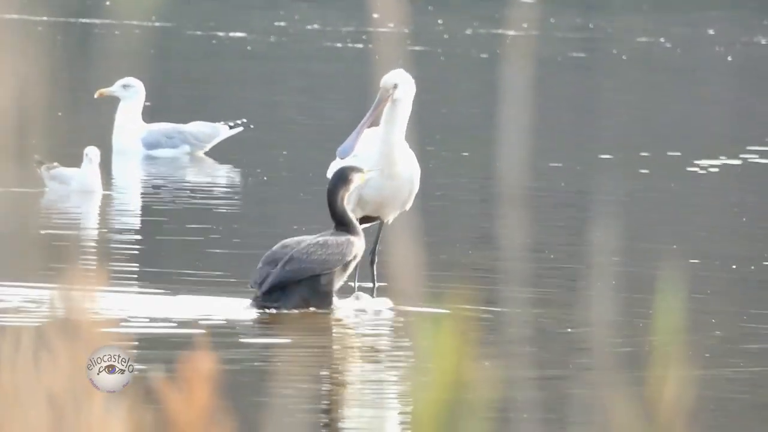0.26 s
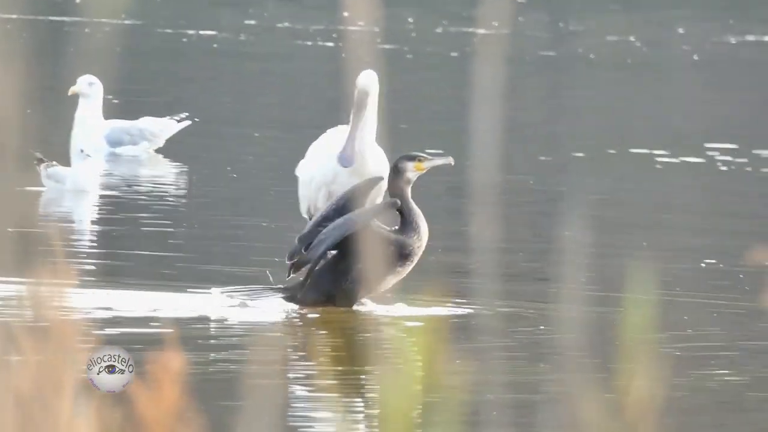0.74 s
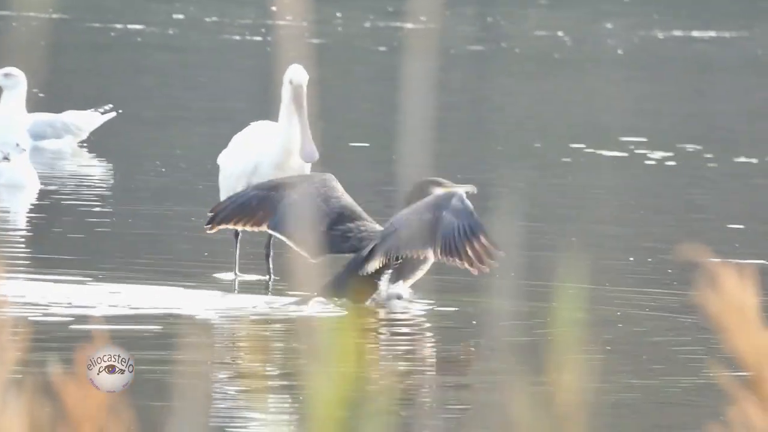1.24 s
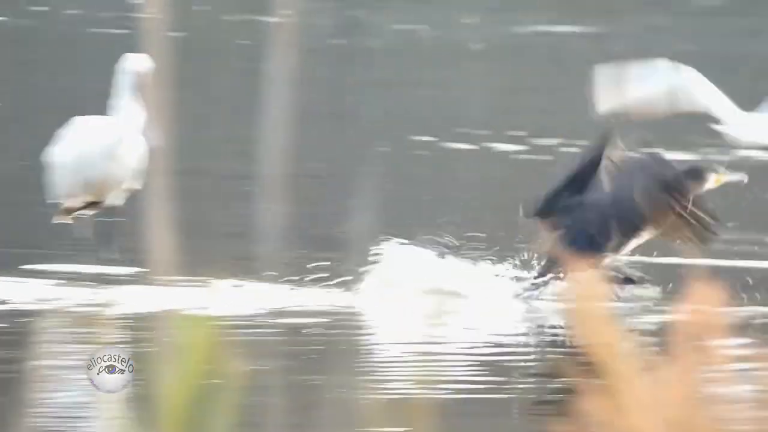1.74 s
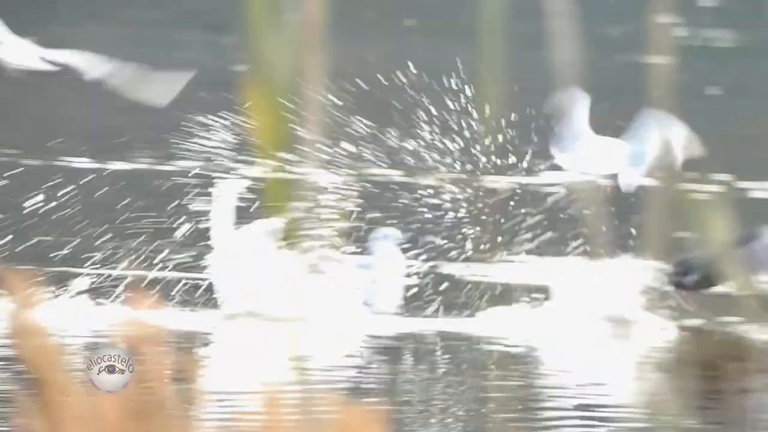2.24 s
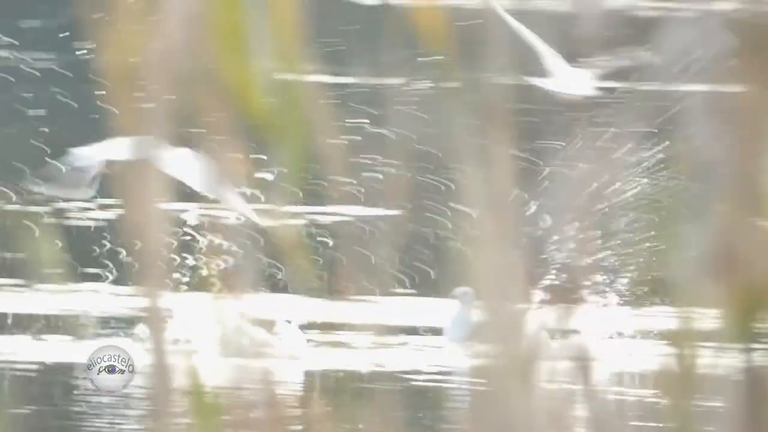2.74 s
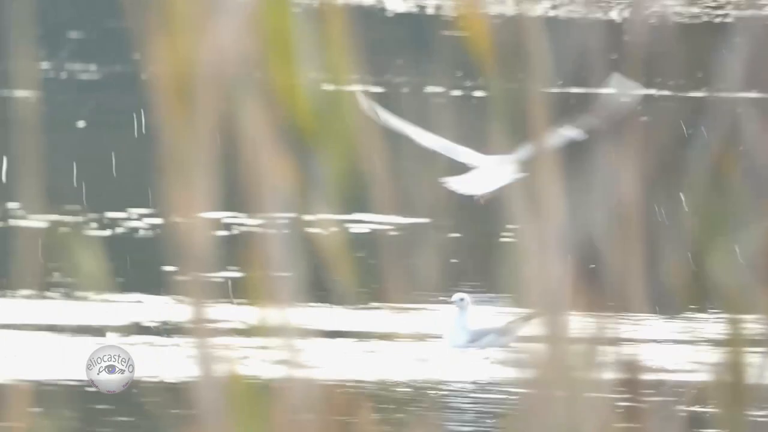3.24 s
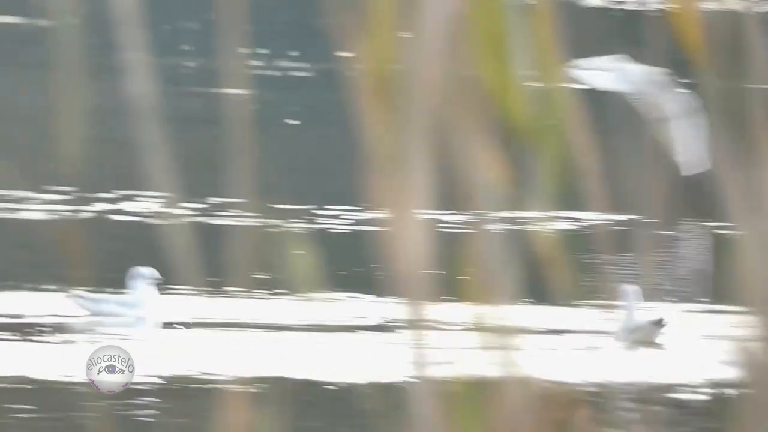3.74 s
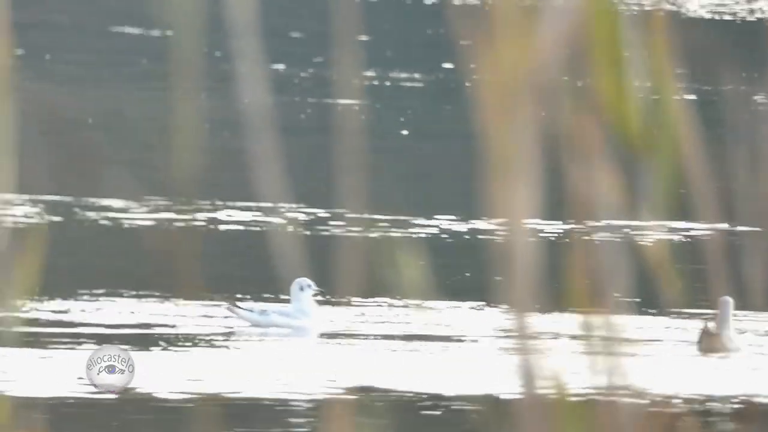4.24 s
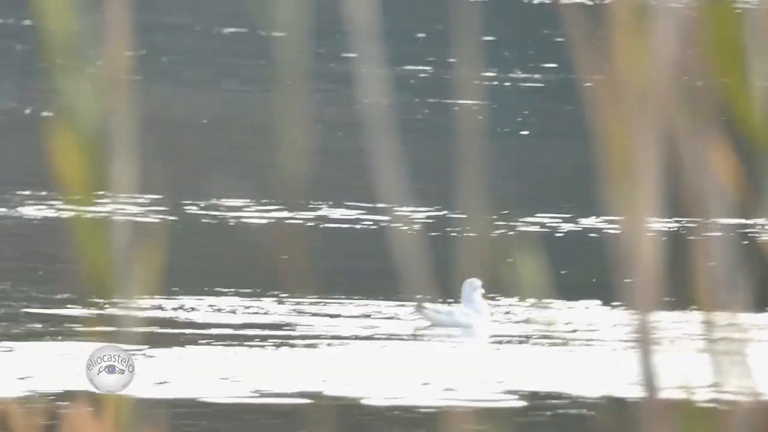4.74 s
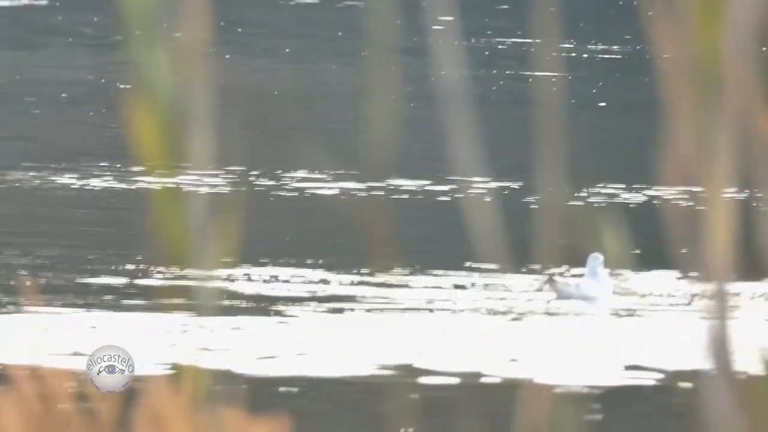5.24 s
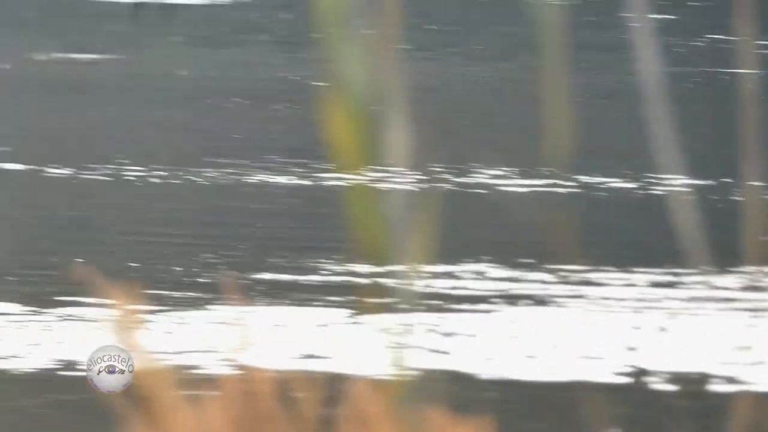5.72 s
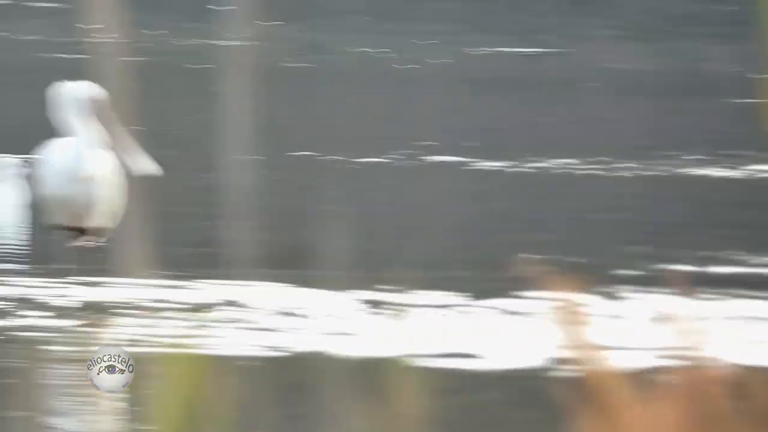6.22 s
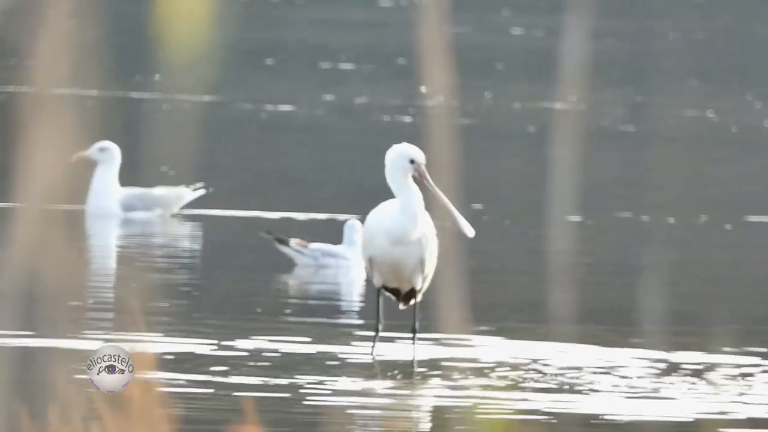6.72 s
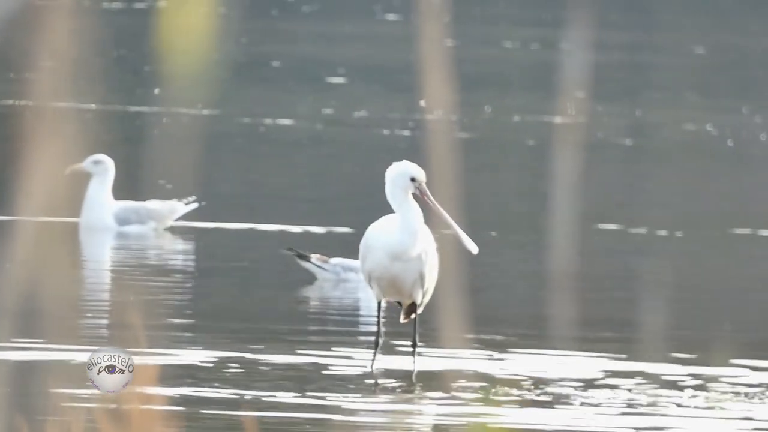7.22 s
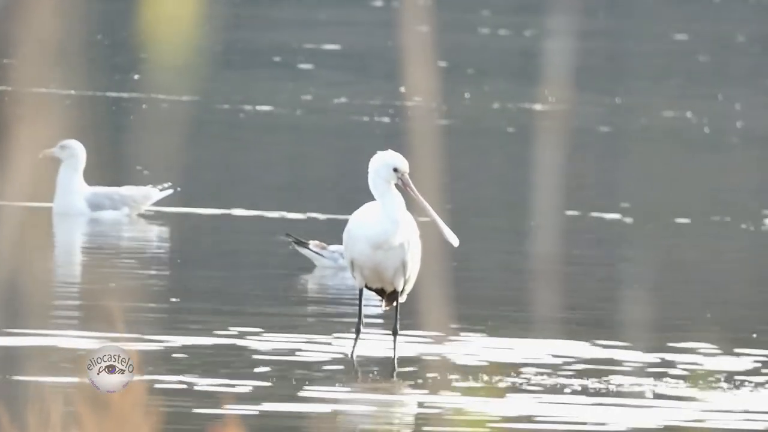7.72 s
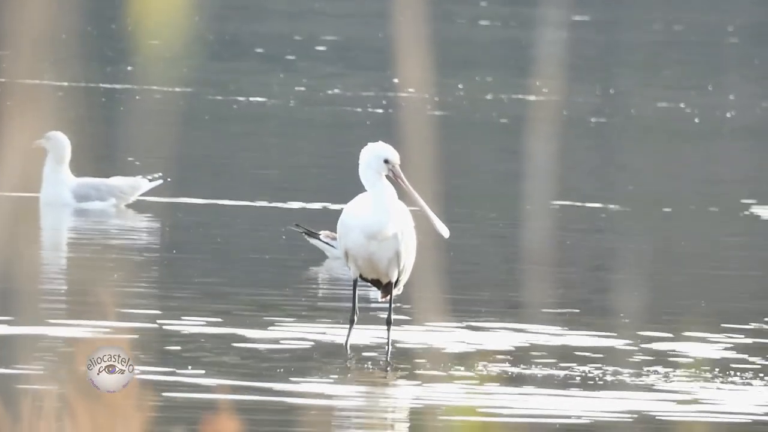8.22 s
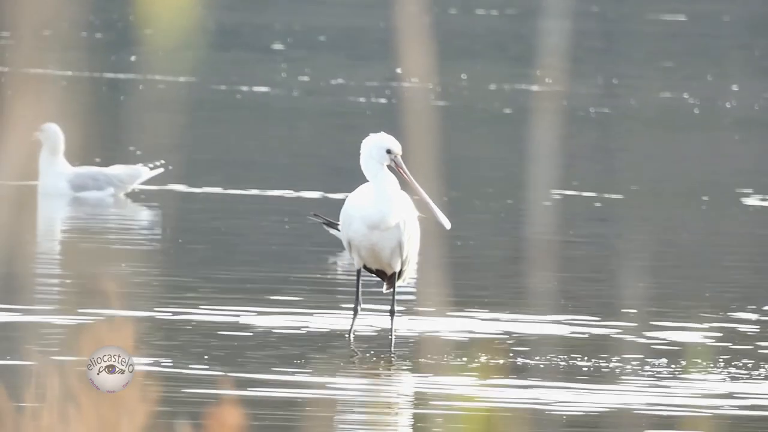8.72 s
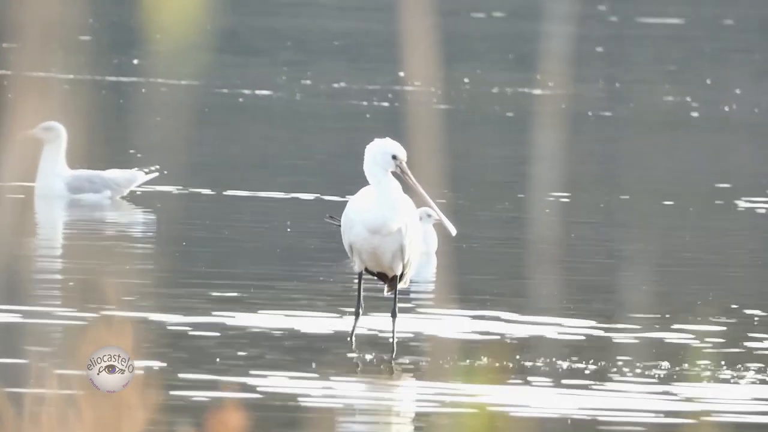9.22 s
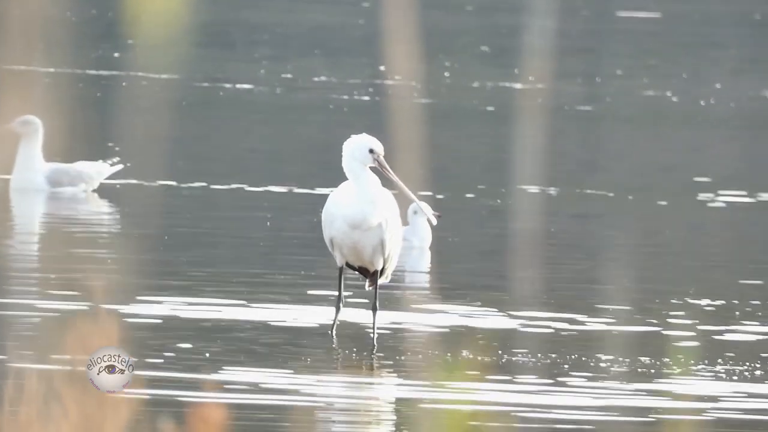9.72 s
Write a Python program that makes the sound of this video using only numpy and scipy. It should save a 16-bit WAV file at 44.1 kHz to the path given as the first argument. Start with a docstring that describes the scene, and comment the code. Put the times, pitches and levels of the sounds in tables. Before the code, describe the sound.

In an open wetland, through a small camera, a hollow low-mid hum and thin hiss run throughout. A large water bird takes off with about five or six sharp wet slaps per second, throwing fine spray that patters down and fades. Dull close ticks and soft bumps intrude. A small far bird gives occasional short rising whistles, others chip faintly, and later a distant engine drones low and goes away.

```python
"""A wetland, heard through a small camera: far wind and traffic hum in the hollows of its housing, over steady
hiss. A water bird takes off with regular slaps (cracks, short rings, splutter) and spray (coloured noise and
ringing drops); its first light strokes, heard as dull ticks, already keep the beat of the slaps. Other dull
ticks and low thumps fall close by. A small far bird whistles rising sine notes, the first already ending as the
scene opens in a fluttering rising glide; others answer with faint chips, most of them falling, and a fluttering
falling glide, smeared by echoes. A distant engine, one wavering sine, comes and goes."""
import sys
import numpy as np
from scipy import signal
from scipy.fft import rfft, irfft, next_fast_len
from scipy.io import wavfile
from scipy.ndimage import uniform_filter1d, map_coordinates

SR = 44100
rng = np.random.default_rng(int(sys.argv[2]) if len(sys.argv) > 2 else 0)


def dump(signal):
    """Clip the signal to [-1, 1] and save it as 16-bit WAV at the path in sys.argv[1]."""
    limited = np.clip(np.atleast_2d(signal).T, -1, 1)
    pcm = np.round(limited * 32767).astype(np.int16)
    wavfile.write(sys.argv[1], SR, pcm)


N = 439236

# Deep hollows of the housing, alike at both ports: centre_hz, width_hz, relative level_db
DEEP_HOLLOWS = [(384, 34, -5), (424, 32, 1), (452, 40, -5), (479, 34, -7), (525, 70, -19)]
# Smaller hollows: centre_hz, width_hz, relative level_db, left_minus_right_db
SMALL_HOLLOWS = [(631, 24, -4, -8), (658.7, 22.6, -2, 11.5), (766, 98, 1.5, -5), (856, 62, 0, -0.5),
                 (922, 210, -10, -12.5), (1164, 104, -8.5, 7), (1319, 110, -2, -3), (1555, 130, -7, 0),
                 (1674, 175, -12.5, -5.5), (1945, 340, -16.5, -1.5), (2318, 260, -18, 4.5),
                 (2690, 360, -20, -1.5), (3050, 180, -24, 4)]
# Hum of the deep hollows, before gusts: time_s, level_db
HUM_LEVEL = [(0, -49.5), (.9, -46), (1.9, -48.5), (2.2, -45.5), (3.1, -45.5), (3.7, -47.5), (4.5, -47.5),
             (6.5, -46.5), (8.1, -48), (9.2, -46.5), (9.96, -47)]
# Traffic rumble, before its wobble: time_s, level_db
TRAFFIC_LEVEL = [(0, -60), (.14, -58.5), (.7, -64), (1.9, -63), (2.2, -58), (3.2, -62), (4.2, -65),
                 (5.4, -61.5), (6.35, -49.5), (7, -54.5), (7.55, -56), (8.2, -56), (9.2, -62.5),
                 (9.96, -59.5)]
# Deepest rumble, before its wobble: time_s, level_db
DEPTH_LEVEL_POINTS = [(0, -72), (.6, -74), (2.2, -79), (3.6, -70.5), (5.1, -66.5), (6.4, -62.5), (8.3, -73),
                      (8.8, -63.5), (9.96, -73)]
# Colours of the rumble and of its deepest part: pitch_hz, relative density_db_per_hz
RUMBLE_COLOUR = [(65, -37), (110, -8), (156, -2), (199, -3), (227, -3.5), (339, -3), (360, -20.5),
                 (470, -8.5), (790, -120)]
DEPTH_COLOUR = [(15, -60), (25, -48), (43, -26.5), (87, -3.5), (110, 0), (140, -20), (240, -120)]
# Hiss shared by left and right: pitch_hz, relative density_db_per_hz
SHARED_HISS_COLOUR = [(1650, -25), (2800, -3.5), (3670, -1), (4120, -3.5), (5480, -3), (5850, -5.5),
                      (6370, -1.5), (7730, -6.5), (9850, 1), (14400, -8.5), (15500, -11)]
# Hiss of opposite sign left and right: pitch_hz, relative density_db_per_hz
OPPOSITE_HISS_COLOUR = [(18, -55), (30, -28), (117, -10), (369, -13), (440, -20), (545, -25), (590, -16),
                        (638, -0.5), (727, 0), (1100, -17), (1330, -8), (2600, -22.5), (5440, -40),
                        (7800, -36), (8500, -25.5), (9660, -19), (14800, -26), (15500, -37)]
# Falling water: pitch_hz, relative density_db_per_hz
WATER_COLOUR = [(880, -51), (1500, -28), (1570, 3.5), (2110, -13), (2310, 0), (2510, -10), (2680, -2.5),
                (3340, -12.5), (3870, -5.5), (4690, -8), (5140, -3), (6960, -5.5), (7850, -13),
                (10100, -6.5), (13500, -31)]
# Rising whistles: start_s, length_s, pitch_a_third_in_hz, knee (share of length), knee_hz,
# leap (share of the time after the knee), base level_db
WHISTLES_HEARD = [(2.398, .12, 3950, .58, 4050, .55, -62.5), (4.86, .116, 3770, .65, 4280, .55, -65.5),
                  (6.19, .13, 3720, .7, 4350, .55, -67.5), (8.1, .128, 3580, .66, 4320, .47, -66.5),
                  (9.852, .125, 3580, .46, 3780, .42, -63.5)]
# Whistle level at start, third, knee, mid-leap, near the top, end: offset_db
WHISTLE_CONTOUR = [-11, -1.5, 1, -3.5, .5, -6]
# Fluttering pitch glides, one rising and one falling:
# start_s, length_s, start_hz, end_hz, slowing (exponent), base level_db
GLIDES_HEARD = [(.015, .06, 3850, 5350, 1.3, -76), (3.752, .165, 5620, 3620, 2.3, -74)]
# Glide level along its length: offset_db
GLIDE_CONTOUR = [-5, 1.5, -3, -6, -8]
# Short notes of other birds, and one low blip: start_s, length_s, start_hz, end_hz, base level_db
CHIPS_HEARD = [(.012, 0.022, 2800, 3000, -79), (.26, 0.033, 3100, 2590, -76), (.27, .035, 4150, 3800, -75),
               (.47, .04, 4600, 4500, -82), (1.915, 0.013, 1700, 1580, -52),
               (1.978, 0.015, 5110, 4970, -61), (2.17, .015, 4320, 4220, -63),
               (2.648, .025, 6330, 6300, -64.5), (2.81, .02, 5700, 5500, -71),
               (2.882, 0.035, 5460, 5750, -68), (3.22, 0.033, 7050, 6880, -70),
               (3.85, .015, 6600, 6500, -78), (4.01, .02, 6230, 6300, -72), (4.085, 0.044, 6700, 6350, -73),
               (4.2, .035, 5700, 5480, -75), (2.277, .016, 3730, 4250, -68), (2.712, .01, 6900, 6800, -65),
               (7.21, 0.06, 6250, 6100, -82), (8.032, .03, 4000, 3500, -75), (8.207, .018, 4250, 3850, -72),
               (8.238, .03, 5000, 3600, -80), (8.518, .035, 5000, 3600, -77.5),
               (8.605, .03, 5150, 5350, -78), (8.785, .022, 4300, 3700, -76),
               (8.81, .035, 4700, 3570, -75.5), (8.972, .048, 4150, 3680, -78),
               (9.07, .04, 4800, 4300, -82), (9.17, .06, 4400, 4000, -80), (9.025, .015, 4300, 3700, -74),
               (9.045, .05, 4800, 3400, -75.5), (9.165, .03, 4100, 3400, -80),
               (9.432, .02, 6200, 4800, -86), (9.44, 0.038, 3900, 4180, -81), (9.47, .02, 4500, 3800, -77),
               (9.485, .03, 4600, 3800, -79), (9.538, .02, 4600, 4100, -81), (9.508, .025, 4040, 3700, -80),
               (9.89, 0.036, 4500, 4200, -72)]
# Chip level, quick start, even body, fade: offset_db
CHIP_CONTOUR = [-8, -3, -2, -3, -9]
# Clearest dull ticks, levels before trims; the first three are the bird's first light strokes, in step with the
# # slaps that follow: start_s, pat_db, pitch_hz, knock_db, bright_edge_db
CLEAREST_TICKS = [(0.1455, -47.5, 3080, -63, -54), (0.3375, -56, 2710, -58, -53),
                  (0.521, -52, 2010, -69, -55), (0.7994, -63, 2620, -57, -75), (0.825, -52, 2900, -70, -73),
                  (1.152, -50, 2330, -67, -54), (.408, -57, 3400, -73, -62), (1.209, -51, 4300, -68, -72),
                  (2.008, -57, 3600, -58, -62), (2.176, -52, 3600, -62, -56), (2.488, -49, 2480, -64, -72),
                  (1.5494, -49, 2280, -62, -67), (2.0462, -56, 2300, -55, -69),
                  (2.414, -48, 2600, -50.5, -68), (2.59, -57, 2140, -59, -68),
                  (4.3161, -53, 2080, -53.5, -75), (4.8458, -50, 2100, -51, -68),
                  (5.048, -48, 2090, -56, -68), (5.1816, -51, 2100, -52.5, -66),
                  (5.233, -58, 2300, -59, -67), (5.349, -50, 2680, -55, -61), (5.4194, -59, 2550, -53, -76),
                  (5.4819, -53, 3320, -50.5, -70), (5.5823, -54, 2010, -51, -67),
                  (5.7467, -50, 2020, -57, -64), (5.9145, -49, 2100, -48, -64),
                  (6.015, -54, 2600, -53, -71), (6.1594, -50, 2180, -50, -49.5),
                  (6.1823, -45, 2700, -56, -52), (7.5214, -50, 3520, -71, -57),
                  (7.5328, -47, 3080, -68, -68), (7.829, -45, 2670, -56, -83)]
# Knock under a tick: pitch_hz, relative level_db, t60_s
KNOCK_MODES = [(737, -2.5, 0.031), (1292, -3.5, 0.038), (1570, -5.5, 0.037)]
# Colour of a soft pat: pitch_hz, gain_db
PAT_COLOUR = [(500, -36), (1000, -39), (2600, -2.5), (4000, -6.5), (5000, -47), (7000, -60)]
# Low bumps: start_s, drive_db (before trim and onset), pitch_hz
BUMPS = [(0.119, -60, 154), (1.63, -65, 108), (2.958, -57, 100), (3.82, -60, 110), (3.978, -62, 123)]
# Wings and feet striking the water, drives before shaping:
# start_s, ring_db, pitch_hz, upper_ring_db, splash_db, crack_db
WATER_SLAPS = [(0.706, -52, 1990, -71, -51, -40), (0.7155, -57, 2900, -67, -59, -46),
               (0.892, -49, 2170, -64, -51, -34), (1.0752, -48, 2660, -56, -54, -36),
               (1.26, -48.5, 2110, -65, -53, -31), (1.4392, -48, 2150, -53, -53, -35),
               (1.6182, -41.5, 2210, -60, -47, -24), (1.795, -42.5, 2400, -56, -47, -31),
               (1.972, -48, 2330, -53, -45.5, -38), (2.146, -49, 2780, -76, -51, -30),
               (2.3603, -69, 2700, -72, -50, -40), (2.5372, -49, 1960, -55, -52, -38),
               (2.7258, -47.5, 2000, -51, -53, -39), (2.916, -41.5, 2280, -52, -51, -35),
               (3.097, -44, 1580, -51, -54, -40), (3.109, -54, 2830, -48, -60, -42),
               (3.2837, -39.5, 2210, -50, -46, -26), (3.466, -52, 2400, -58, -59, -40),
               (3.469, -47, 2090, -47, -52, -32), (3.653, -46, 2400, -49, -59, -40),
               (3.8396, -44.5, 2240, -68, -52, -36), (4.0222, -55, 1900, -56, -57, -38)]
# Ring of a slap: multiple of its pitch (ratio), relative level_db, t60_s
SLAP_MODES = [(.72, -10, 0.015), (1, 2.5, 0.012)]
# Upper ring of a slap: pitch_hz, relative level_db, t60_s
UPPER_SLAP_MODES = [(3770, -2.5, 0.019), (4220, 0, 0.012), (5020, -5, 0.021)]
# Colour of the crack in a slap: pitch_hz, gain_db
CRACK_COLOUR = [(600, -30), (1600, -13), (5000, -3.5), (10500, -11), (13000, -20), (16000, -50)]
# Engine note, before its wavering: time_s, pitch_hz, level_db
ENGINE_NOTE = [(4.25, 231, -82), (4.45, 231, -68), (4.95, 231.5, -65.5), (5.07, 231, -82), (5.35, 230, -82),
               (5.55, 229.6, -61), (5.9, 229.6, -59.5), (6.12, 229.6, -55.5), (6.6, 229.6, -58),
               (7.12, 229.4, -59), (7.27, 229, -74), (7.75, 228.5, -69), (7.9, 228.5, -61.5),
               (8.35, 227.5, -66), (8.6, 227, -80), (8.7, 227, -100)]
# Band that carries across the water: pitch_hz, gain_db
TREBLE_BAND = [(1100, -24), (2200, -5), (3500, -7), (10500, -7.5), (13000, -20), (16000, -50)]

TOP_HZ = 15670
HISS_PAN_DB, FAR_PAN_DB = -0.2, 0.8  # left minus right; far means slaps and birds
# Small hollows: base level, then exponents on the hum and traffic levels, and share of the gusts
SMALL_DB, SMALL_FOLLOWS_HUM, SMALL_FOLLOWS_TRAFFIC, SMALL_GUSTS = -60, 0.82, 0.17, .55
# Spray is fullest from the peak time for the hold time
SPRAY_PEAK_S, SPRAY_HOLD_S, SPRAY_BASE_DB = 2.21, 0.33, -62.5
SPRAY_RISE_DB_PER_S, SPRAY_FALL_DB_PER_S = 8, 5.5
LOOSE_DROPS_END_S = 4.9  # drops not thrown by slaps fall evenly until then
DROP_DELAY_S, THROWN_SHARE = .08, 0.35  # mean delay after a slap; share of drops thrown by slaps
SURGE_DB, SURGE_S = 1.6, .06  # swell of the spray at a slap; time constant of its sinking
WHISTLE_LOW_HZ, WHISTLE_TOP_HZ = 3400, 5400
LEAP_DONE = .72  # share of the climb from knee to top made in the steep leap
CHIP_FLUTTER_DB = 3.1
TWITTER_FROM_S, TWITTER_S, TWITTER_BASE_DB = 7.9, 2, -86
FAINT_TICK_BASE_DB, FAINT_TICK_SPAN_S, FAINT_TICK_BRIGHT_DB = -59.5, 4.8, -72


def amp(db):
    """Gain of a level in dB."""
    return 10 ** (np.asarray(db) / 20)


def unit(x):
    """x at rms 1."""
    return x / np.sqrt(np.mean(x ** 2) + 1e-20)


def along(points, hz):
    """Reads (Hz, value) points on a log pitch axis."""
    f, v = np.transpose(points)
    return np.interp(np.log(hz + 1), np.log(f + 1), v)


def level(rows):
    """Gain for each sample from (s, dB) rows."""
    s, db = np.transpose(rows)
    return amp(np.interp(np.arange(N) / SR, s, db))


def wobble(rate):
    """A smooth random curve, rate knots a second."""
    knots = rng.standard_normal(int(N * rate / SR) + 4)
    return map_coordinates(knots, [np.arange(N) * rate / SR])


def filtered(x, response):
    """x shaped by a gain that depends on frequency."""
    m = next_fast_len(N + SR // 2)
    return irfft(rfft(x, m) * response(np.fft.rfftfreq(m, 1 / SR)), m)[..., :N]


def coloured(x, colour):
    """x through a table of (Hz, dB) gains."""
    return filtered(x, lambda hz: amp(along(colour, hz)))


def rush(colour, patchy_db):
    """Coloured noise of rms 1 whose gain varies in random patches of time and pitch."""
    z = signal.stft(rng.standard_normal(N + 512), nperseg=512)[2]
    across_pitch = uniform_filter1d(rng.standard_normal(z.shape), 5, 0)
    patches = unit(uniform_filter1d(across_pitch, 8, 1))
    noise = signal.istft(z * amp(patchy_db * patches), nperseg=512)[1][:N]
    return unit(coloured(noise, colour))


def add(track, s, sound):
    """Mixes a short sound into the track at time s."""
    part = track[round(s * SR):][:len(sound)]
    part += sound[:len(part)]


def echo(x, t60):
    """The scattered answer of reeds and banks: a decaying noise tail."""
    t = np.arange(SR // 4) / SR
    tail = rng.standard_normal(len(t)) * amp(-60 * t / t60)
    return signal.fftconvolve(x, tail / np.linalg.norm(tail))[:N]


def ring(modes, t, rise_s):
    """Decaying modes struck at slightly new strengths and pitches."""
    chance = rng.normal([0, 1], [1.8, .03], size=(len(modes), 2))  # dB, pitch ratio
    sound = 0
    for (hz, db, t60), (more_db, bend) in zip(modes, chance):
        decay = amp(db + more_db - 60 * t / t60)
        sound = sound + decay * np.sin(2 * np.pi * hz * bend * t)
    return sound * (1 - np.exp(-t / rise_s))


def treble(x):
    """Only the upper band of a noise burst carries across the water."""
    return coloured(x, TREBLE_BAND)


def hollow(hz, centre, width, db):
    """Power passed by a steep-sided resonance."""
    return amp(db) ** 2 / (1 + (2 * (hz - centre) / width) ** 2) ** 2


def deep_response(hz):
    """Gain of the deep hollows, their powers summed."""
    return np.sqrt(sum(hollow(hz, *row) for row in DEEP_HOLLOWS))


def small_response(hz):
    """Gain of the small hollows at the left and right ports, their powers summed."""
    power = 0
    for centre, width, db, pan in SMALL_HOLLOWS:
        power = power + hollow(hz, centre, width, [[db + pan / 2], [db - pan / 2]])
    return np.sqrt(power)


def hum():
    """Outdoor noise sets the hollows ringing; each small one reaches the two ports at its own strength."""
    white = [(100, 0), (1000, 0)]
    deep = unit(filtered(rush(white, patchy_db=2.5), deep_response))
    small = unit(filtered(rush(white, patchy_db=2.0), small_response))
    gust = .4 * wobble(9) + 1.1 * wobble(22)
    deep_gain = level(HUM_LEVEL) * amp(1.23 * gust)
    follow = level(HUM_LEVEL) ** SMALL_FOLLOWS_HUM * level(TRAFFIC_LEVEL) ** SMALL_FOLLOWS_TRAFFIC
    small_gain = amp(SMALL_DB) * unit(follow) * amp(SMALL_GUSTS * gust)
    return deep_gain * deep + small_gain * small


def traffic():
    """Far rumble of low noise, with a deeper part that swells on its own."""
    rumble = level(TRAFFIC_LEVEL) * amp(0.13 * wobble(11.0)) * rush(RUMBLE_COLOUR, patchy_db=1.4)
    depth = level(DEPTH_LEVEL_POINTS) * amp(2.2 * wobble(3.3)) * rush(DEPTH_COLOUR, patchy_db=1)
    return rumble + depth


def hiss():
    """Steady hiss: a shared noise plus a noise of opposite sign left and right."""
    shared = amp(-72) * rush(SHARED_HISS_COLOUR, patchy_db=1.2)
    opposite = amp(-72) * rush(OPPOSITE_HISS_COLOUR, patchy_db=0.9)
    return np.array([shared + opposite, shared - opposite]) * amp([[HISS_PAN_DB / 2], [-HISS_PAN_DB / 2]])


def spell(start, length, db, rise_db_per_s, fall_db_per_s):
    """A level in dB that climbs to db, holds for the length and sinks again."""
    t = np.arange(N) / SR
    climb = rise_db_per_s * np.maximum(start - t, 0)
    fall = fall_db_per_s * np.maximum(t - start - length, 0)
    return db - climb - fall


def surges():
    """Between 0 and 1: rises quickly into each slap and sinks back after it."""
    since = np.arange(N) / SR - np.array(WATER_SLAPS)[:, :1]
    rise, fall = np.exp(-np.abs(since) / .03), np.exp(-np.abs(since) / SURGE_S)
    return np.where(since > 0, fall, rise).max(axis=0)


def water_drops(count=3500):
    """Single drops, each ringing for a few cycles; some cluster after the slaps."""
    when, pitch, size, thrown, late = rng.random((count, 5)).T
    slap_s = np.array(WATER_SLAPS)[(when * len(WATER_SLAPS)).astype(int), 0]
    after_slap_s = slap_s - DROP_DELAY_S * np.log(late)
    s = np.where(thrown < THROWN_SHARE, after_slap_s, when * LOOSE_DROPS_END_S)
    hz, t = 1800 * 4.5 ** pitch[:, None], np.arange(400) / SR
    gain = amp(6.2 * size[:, None] ** 2 + along(WATER_COLOUR, hz))
    # drops that fall soonest after a slap ring for the most cycles
    decay = np.exp(-hz * t / (3 + 8 * late[:, None] ** 2))
    onset = 1 - np.exp(-hz * t / 2.0)
    grains = gain * decay * onset * np.sin(2 * np.pi * hz * t)
    at = (s[:, None] * SR).astype(int) + np.arange(400)
    return unit(np.bincount(at.ravel(), grains.ravel(), N))


def spray():
    """Thrown water falls back: a fine rush in surges, a little wide, with single drops in it."""
    drops = np.sqrt(.5) * water_drops()
    wash = .75 * rush(WATER_COLOUR, patchy_db=2.2) + .56 * drops
    wide = amp(-14.5) * rush(WATER_COLOUR, patchy_db=5)
    swell_db = spell(SPRAY_PEAK_S, SPRAY_HOLD_S, SPRAY_BASE_DB, SPRAY_RISE_DB_PER_S, SPRAY_FALL_DB_PER_S)
    surge_db = SURGE_DB * (surges() - 1.0)
    flicker_db = 2.0 * wobble(21.1) + 0.82 * wobble(40)
    return amp(swell_db + surge_db + flicker_db) * np.array([wash + wide, wash - wide])


def note(s, hz, db, flutter_db):
    """A sine that follows pitch and level points; level and phase flutter every few milliseconds."""
    t = np.arange(s[0], s[-1], 1 / SR)
    pitch = uniform_filter1d(np.interp(t, s, hz), size=120)  # rounds the corners
    phase = 2 * np.pi * np.cumsum(pitch) / SR
    flutter = map_coordinates(rng.standard_normal(size=80), [(t - s[0]) * 300])
    gain = np.sqrt(2) * amp(np.interp(t, s, db) + flutter_db * flutter)
    return gain * np.sin(phase + flutter_db / 6 * flutter)


def glide(s, length, start_hz, end_hz, slows, shape_db, flutter_db):
    """A note that slides from one pitch to another, ever more slowly."""
    at = np.array([0, .1, .25, .4, .55, .7, 1])
    hz = end_hz + (start_hz - end_hz) * (1 - at) ** slows
    db = np.interp(at, [0, .1, .4, .7, 1], shape_db)
    return note(s + at * length, hz, db, flutter_db)


def whistle(s, length, third_hz, knee, knee_hz, leap, db):
    """A slow climb to the knee, then a leap that eases off at the top."""
    at = np.array([0, 1 / 3, knee, knee + leap * (1 - knee), .93, 1])
    leap_hz = knee_hz + LEAP_DONE * (WHISTLE_TOP_HZ - knee_hz)
    hz = [WHISTLE_LOW_HZ, third_hz, knee_hz, leap_hz, 0.957 * WHISTLE_TOP_HZ, WHISTLE_TOP_HZ]
    return note(s + np.sort(at) * length, hz, db + np.array(WHISTLE_CONTOUR), flutter_db=1.4)


def twitter(count=36):
    """Chip rows for a faint crowd of falling chips at random moments."""
    rows = []
    for when, long, high, size in rng.random((count, 4)):
        start_hz, end_hz = 4100 + 900 * high, 3500 + 500 * long
        s = TWITTER_FROM_S + TWITTER_S * when
        rows.append((s, 0.0168 + 0.019 * long, start_hz, end_hz, TWITTER_BASE_DB + 4 * size))
    return rows


def birds():
    """Whistles, glides and chips, smeared by echoes off reeds and water."""
    calls, chips = np.zeros(N), np.zeros(N)
    for row in WHISTLES_HEARD:
        add(calls, row[0], whistle(*row))
    for *row, db in GLIDES_HEARD:
        add(calls, row[0], glide(*row, db + np.array(GLIDE_CONTOUR), flutter_db=3.6))
    for *row, db in CHIPS_HEARD + twitter():
        add(chips, row[0], glide(*row, 1.6, db + np.array(CHIP_CONTOUR), CHIP_FLUTTER_DB))
    return calls + chips + echo(amp(-10.0) * calls + amp(-5.5) * chips, t60=.2)


def faint_ticks(count=14):
    """Tick rows for a random scatter of fainter ticks."""
    rows = []
    for when, size, pitch, knock in rng.random((count, 4)):
        s, hz = .05 + FAINT_TICK_SPAN_S * when, 2000 + 1200 * pitch ** 2
        pat_db, knock_db = FAINT_TICK_BASE_DB + 4 * size, FAINT_TICK_BASE_DB + 6 * knock
        rows.append((s, pat_db, hz, knock_db, FAINT_TICK_BRIGHT_DB))
    return rows


def ticks():
    """Each tick: a soft noisy pat with one short pitch in it, over a low knock, with a bright edge."""
    tones, pats, bright = np.zeros(N), np.zeros(N), np.zeros(N)
    t = np.arange(SR // 16) / SR
    swell = amp(-60 * np.abs(t - .004) / np.where(t < .004, .012, .03))  # peaks 4 ms in
    for s, db, hz, knock_db, bright_db in CLEAREST_TICKS + faint_ticks():
        add(tones, s, amp(db - 4.0) * ring([(hz, 0, .015)], t, rise_s=0.0011))
        add(tones, s, amp(knock_db + 6.5) * ring(KNOCK_MODES, t, rise_s=0.0017))
        add(pats, s - .003, amp(db - 0.5) * swell * rng.standard_normal(len(t)))
        add(bright, s, amp(bright_db - 60 * t / 0.04) * rng.standard_normal(len(t)))
    return tones + treble(bright) + coloured(pats, PAT_COLOUR)


def thumps():
    """Soft low bumps on the camera body: sines with a rounded onset and a quick decay."""
    track, t = np.zeros(N), np.arange(SR // 8) / SR
    onset = (1 - np.exp(-t / .008)) ** 2
    for s, db, hz in BUMPS:
        add(track, s, amp(db + 15 - 60 * t / .12) * onset * np.sin(2 * np.pi * hz * t))
    return track


def slaps():
    """Each slap: a short noise that grows into it, a ragged crack with a short ring, a lumpy splutter of drops."""
    rings, bright, cracks = np.zeros(N), np.zeros(N), np.zeros(N)
    t = np.arange(SR // 8) / SR
    lead = t[:SR // 40]
    growth = amp(-5.5 - 60 * lead[::-1] / .05)
    for s, db, hz, upper_db, splash_db, crack_db in WATER_SLAPS:
        modes = [(ratio * hz, gain_db, t60) for ratio, gain_db, t60 in SLAP_MODES]
        add(rings, s, amp(db) * ring(modes, t, rise_s=0.00023))
        add(rings, s, amp(upper_db) * ring(UPPER_SLAP_MODES, t, rise_s=0.00041))
        cracks[round((s + .0007) * SR)] -= amp(crack_db)
        # two more cracks, about 6 and 14 ms in
        for late_s, more_db in rng.normal([[.006, 0], [.014, -4]], [.0015, 3]):
            cracks[round((s + late_s) * SR)] -= amp(crack_db + more_db)
        lumps = amp(5 * map_coordinates(rng.standard_normal(size=60), [t * 300]))
        burst = amp(-1 - 60 * t / .025) + amp(-10 - 60 * t / .12) * lumps
        add(bright, s, amp(splash_db) * burst * rng.standard_normal(len(t)))
        add(bright, s - len(lead) / SR, amp(splash_db) * growth * rng.standard_normal(len(lead)))
    return rings + treble(bright) + coloured(cracks, CRACK_COLOUR) + amp(-12.5) * echo(rings, t60=.12)


def engine():
    """The note of one engine, a slightly wavering sine, coming and going."""
    s, hz, db = np.transpose(ENGINE_NOTE)
    t = np.arange(N) / SR
    turns = np.cumsum(np.interp(t, s, hz) + .2 * wobble(3.3)) / SR
    gain = amp(np.interp(t, s, db) + .8 * wobble(3))
    return gain * np.sqrt(2) * np.sin(2 * np.pi * turns)


def scene():
    """Sums all layers; far birds and slaps arrive almost alike at both ports."""
    far = (birds() + slaps()) * amp([[FAR_PAN_DB / 2], [-FAR_PAN_DB / 2]])
    return hum() + traffic() + hiss() + spray() + far + ticks() + thumps() + engine()


def record(dry):
    """The camera keeps nothing above its band limit."""
    return filtered(dry, lambda hz: hz < TOP_HZ)


dry = scene()
out = record(dry)
dump(out)
```